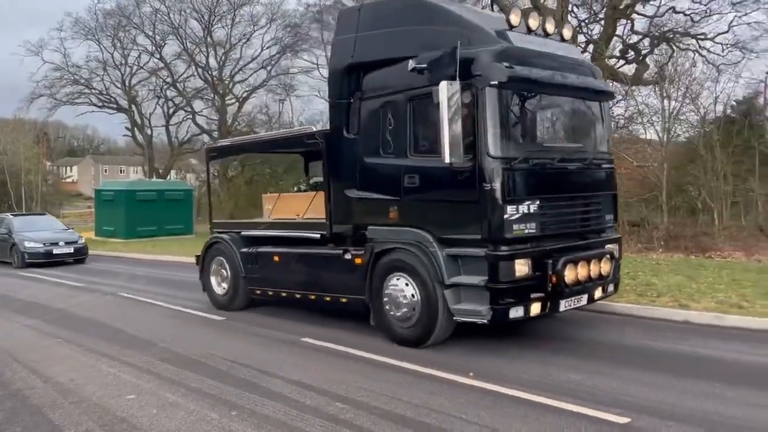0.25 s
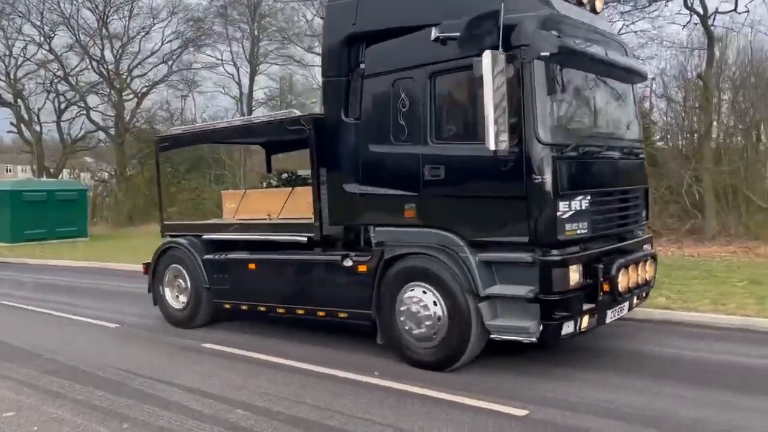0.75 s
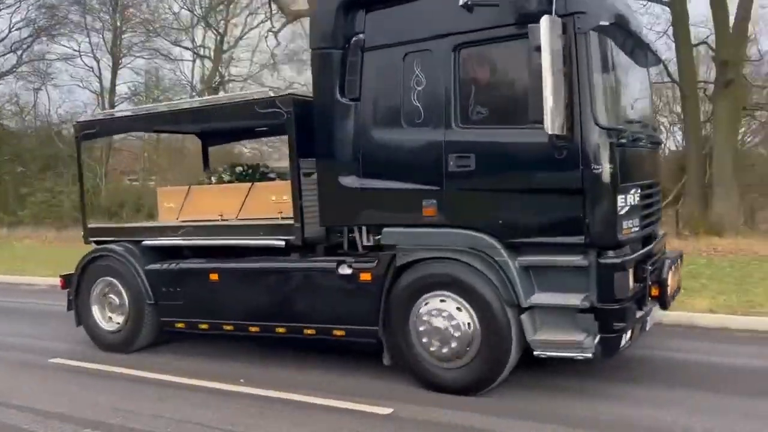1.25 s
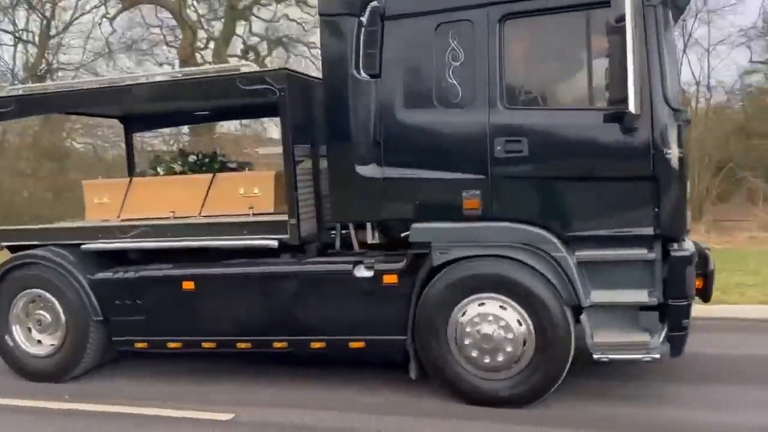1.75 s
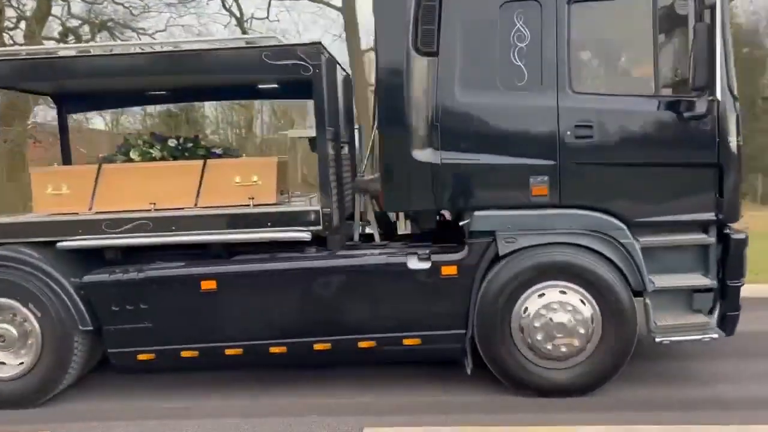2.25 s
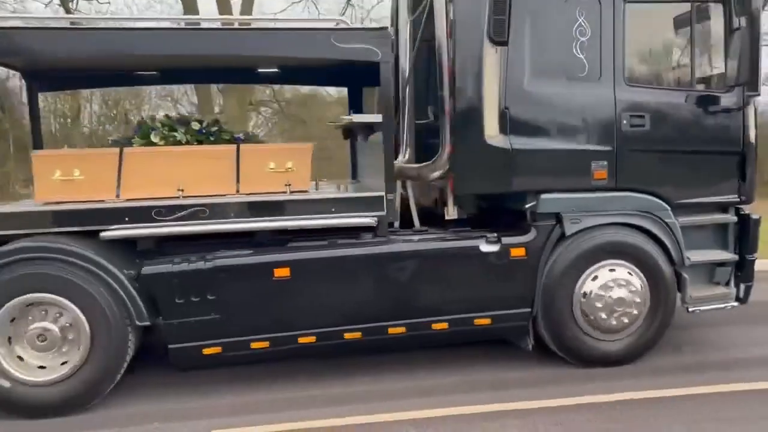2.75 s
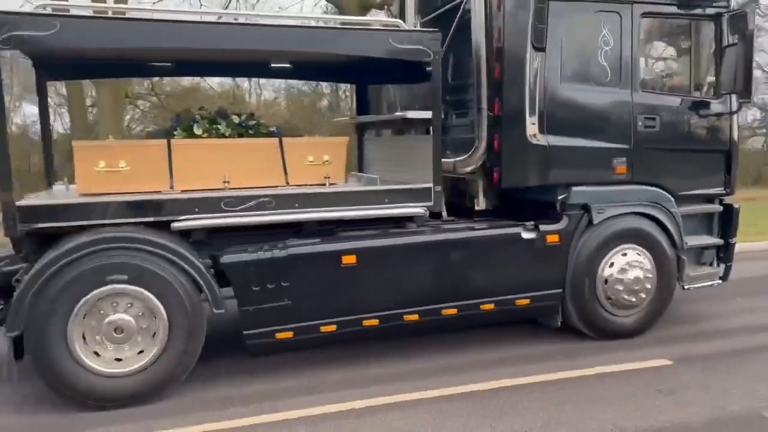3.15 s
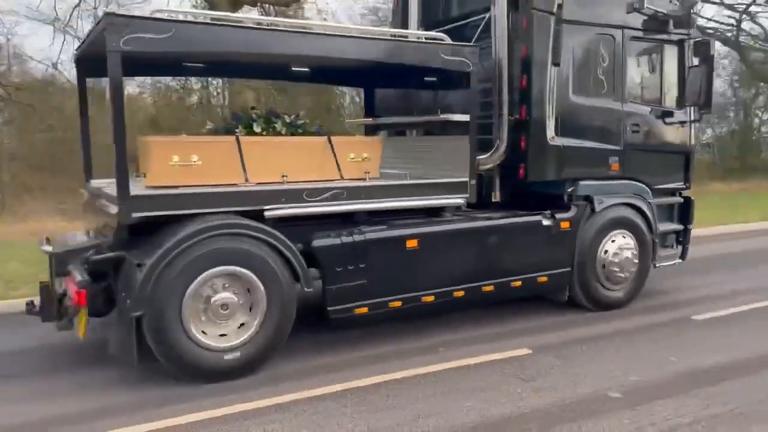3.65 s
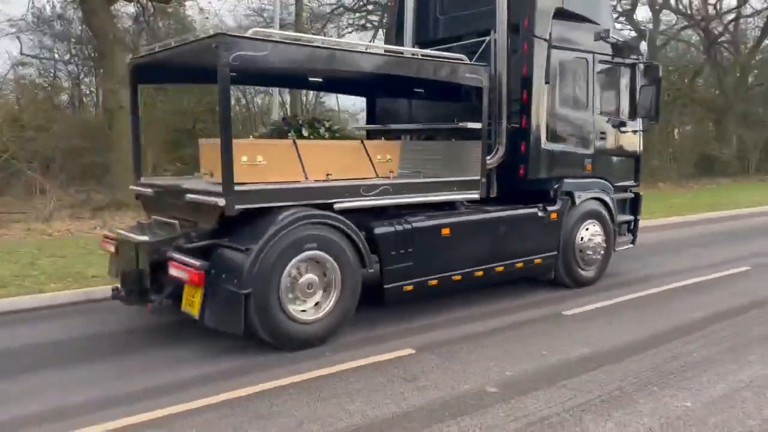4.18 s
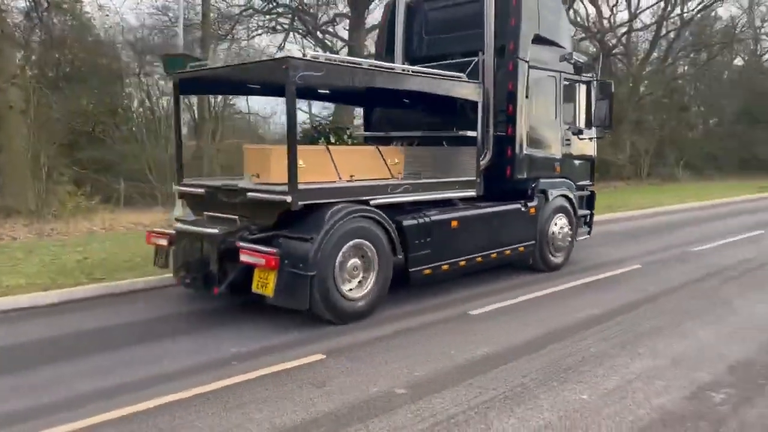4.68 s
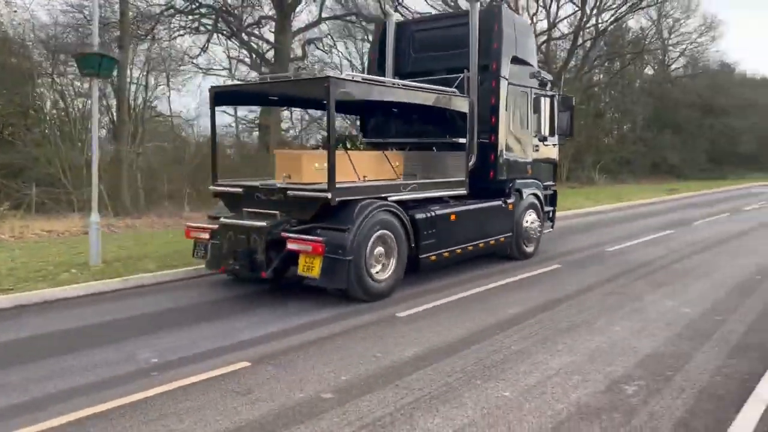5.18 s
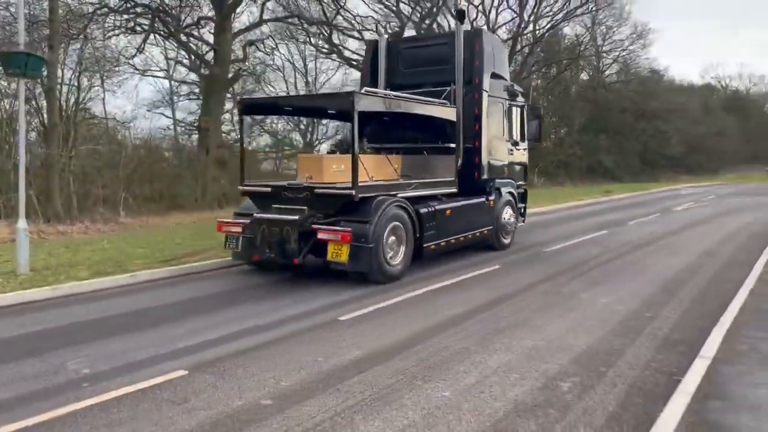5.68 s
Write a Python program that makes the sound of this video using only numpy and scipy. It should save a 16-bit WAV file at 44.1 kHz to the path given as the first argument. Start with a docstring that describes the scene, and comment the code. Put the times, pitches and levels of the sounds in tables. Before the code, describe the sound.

One loud, low-pitched truck horn blast cuts off with a faint echo, then a steady chugging diesel rolls by close at hand.

```python
"""An air horn on a lorry holds one note for a second and a half as the lorry rolls past a few metres away.
The horn is a sum of swelling partials; scattered delays make its faint echo from trees by the road.
The six-cylinder diesel, steady at three beats a revolution, one a heavy thump, is crank-locked tones and gated
noise: it booms from the side and thuds from behind. Ringing noise makes combustion clatter and a rattling panel,
crank-locked tones make whining gears, and shaped noise makes the tyres, a low rumble and wind."""
import sys
import numpy as np
from scipy import signal
from scipy.fft import rfft, irfft
from scipy.io import wavfile

SR = 44100
rng = np.random.default_rng(int(sys.argv[2]) if len(sys.argv) > 2 else 0)


def put_to_file(sound):
    """Save the sound as 16-bit audio at rate SR, in the file named by the first command-line argument."""
    columns = np.atleast_2d(sound).T  # one column per channel
    safe = np.clip(columns, -1, 1)
    whole_steps = np.round(safe * 32767)
    wavfile.write(sys.argv[1], SR, whole_steps.astype(np.int16))


N = 261200
TIME = np.arange(N) / SR
FREQS = np.maximum(np.arange(N // 2 + 1) * SR / N, 1)
SPEED_M_PER_S, NEAREST_M, AIR_M_PER_S = 3.2, 4.8, 343

# crankshaft speed: (time [s], speed [revolutions/s])
CRANK_SPEED = [(0, 17.13), (1.5, 17.125), (2, 17.1), (2.7, 17.125), (3.8, 17.125), (4.4, 17.045),
               (5.92, 17.015)]


def from_db(db):
    """Decibels to gain."""
    return 10 ** (np.asarray(db) / 20)


def rms_one(x):
    """Scale to unit power."""
    return x / np.sqrt(np.mean(x ** 2) + 1e-20)


def in_time(rows):
    """Interpolate each column of a time table, sample by sample."""
    s, *columns = np.transpose(rows)
    return [np.interp(TIME, s, column) for column in columns]


def at_hz(points, hz=FREQS):
    """Read a table on a log-frequency axis."""
    points = np.array(points)
    return np.interp(np.log(hz), np.log(points[:, 0]), points[:, 1])


def hump(hz, centre_hz, octaves):
    """A bell of height 1 on a log-frequency axis."""
    return np.exp(-(np.log2(hz / centre_hz) / octaves) ** 2)


def bell(centre_s, width_s):
    """A smooth rise and fall of height 1 in time."""
    return np.exp(-((TIME - centre_s) / width_s) ** 2)


def colour(x, response):
    """Filter by a frequency response."""
    return irfft(rfft(x) * response, N)


def drift(corner_hz):
    """Slow random signal of unit power."""
    return rms_one(colour(rng.standard_normal(N), 1 / (1 + (FREQS / corner_hz) ** 2)))


def resonances(modes):
    """Response of parallel ringing modes."""
    response = 0
    for hz, width_hz, db in modes:
        response = response + from_db(db) / (1 + 1j * (FREQS ** 2 - hz ** 2) / (FREQS * width_hz))
    return response


def stereo_noise(response, gate=1, source=None):
    """Gated, filtered noise whose likeness in the two channels depends on frequency."""
    # scattered sound: (frequency [Hz], likeness of the two channels [0-1])
    likeness = [(60, .995), (380, .97), (700, .8), (1300, .5), (2400, .35), (3500, .7), (5000, .7),
                (8000, .2)]
    if source is None:
        source = rng.standard_normal((2, N))
    mid, side = source * gate
    alike = np.clip(at_hz(likeness), 0, 1)
    common = colour(mid, response * np.sqrt(1 + alike))
    opposed = colour(side, response * np.sqrt(1 - alike))
    return rms_one(common + opposed * [[1], [-1]])


def path(behind_m=0):
    """Straight steady pass: distance [m] and angle [degrees] from heading to listener, for a point behind the horn."""
    nearest_s = 2.6
    to_go_m = SPEED_M_PER_S * (nearest_s - TIME) + behind_m
    return np.hypot(to_go_m, NEAREST_M), np.degrees(np.arctan2(NEAREST_M, to_go_m))


def road_lag(distance_m, height_m):
    """Delay [s] of the bounce off the road: longest when the source is nearest."""
    listener_m = 1.575
    bounced_m = np.hypot(distance_m, height_m + listener_m)
    direct_m = np.hypot(distance_m, height_m - listener_m)
    return (bounced_m - direct_m) / AIR_M_PER_S


def road_bounce(x, strength):
    """Sound of the high stack plus its reflection: a comb that slides as the lorry moves."""
    behind_m, height_m = 1.05, 3.55
    distance_m, _ = path(behind_m)
    return x + strength * np.interp(TIME - road_lag(distance_m, height_m), TIME, x)


def dipping_gain(source):
    """Gain of a source that sinks for a while during and just after the horn note."""
    # by source: (level [dB], loss [dB], deepest at [s], width [s])
    dips = { "puffs": (-37, 4, 1.12, -0.8), "clatter": (-46, 8, 1.65, 0.48), "gears": (-52, 13, 1.3, 1.24),
            "tyres": (-60, 7.5, 1.74, 0.6), "rumble": (-37, 1.5, 1.1, 1.5), }
    level_db, loss_db, centre_s, width_s = dips[source]
    return from_db(level_db - loss_db * bell(centre_s, width_s))


def ports(x, balance_db, lead_radians):
    """Two microphone ports colour and delay a sound differently, depending on where it comes from."""
    half = from_db(balance_db / 2) * np.exp(.5j * lead_radians)
    return colour(x, np.array([half, 1 / half]))


def firing_gate(turns, cylinder_db, decay_beats, scatter_db, floor):
    """A burst at each firing that decays over the beat; cylinders differ, and so does each stroke."""
    beat = np.floor(3 * turns).astype(int)
    age_beats = 3 * turns - beat
    strength_db = np.array(cylinder_db)[beat % len(cylinder_db)]
    strength_db = strength_db + scatter_db * rng.standard_normal(N)[beat]
    return floor + from_db(strength_db) * np.exp(-age_beats / decay_beats)


def cycle_noise(turns, repeat, count=5, size=5120):
    """Noise that partly returns every two revolutions, its shape changing slowly with the angle."""
    place = (turns / 2 % 1 * size).astype(int)
    weights = np.array([bell(s, 0.9) for s in np.linspace(0, TIME[-1], count)])
    shapes = rng.standard_normal((2, count, size))[..., place]
    returning = (shapes * weights).sum(axis=1) / np.linalg.norm(weights, axis=0)
    fresh = rng.standard_normal((2, N))
    return np.sqrt(repeat) * returning + np.sqrt(1 - repeat) * fresh


def wind():
    """Brief low buffets on the microphone."""
    # gusts: (time [s], width [s], level [dB])
    gusts = [(.33, 0.25, -36), (1.85, 0.17, -41), (3.9, .12, -39), (5.74, .2, -35.5)]
    gain = sum(from_db(db) * bell(s, width_s) for s, width_s, db in gusts)
    return gain * stereo_noise(hump(FREQS, 70, octaves=1.2))


def rumble():
    """Low noise shaped by a fixed spectrum."""
    # spectrum: (frequency [Hz], relative density [dB])
    spectrum = [(8, -23), (20, 3.5), (35, 7), (55, 9), (80, 13.5), (120, 10.5), (200, 12.5), (400, -59)]
    return dipping_gain("rumble") * stereo_noise(from_db(at_hz(spectrum)))


def tyres():
    """Tyre noise: treble with a fixed spectrum, quieter for a while around the end of the horn note."""
    # spectrum: (frequency [Hz], relative density [dB])
    spectrum = [(1000, -8.5), (3000, 1), (4300, 9.5), (5100, -5.5), (5700, -24), (6500, -1), (8700, -0.5),
                (9300, -27), (11000, -21.5)]
    return dipping_gain("tyres") * stereo_noise(from_db(at_hz(spectrum)))


def rattles():
    """Short bursts of chatter ring a loose panel."""
    # bursts: (onset [s], level [dB])
    bursts = [(3.248, -46.5), (3.833, -44), (3.951, -46), (4.474, -40), (4.968, -48), (5.125, -43),
              (5.235, -47), (5.36, -51), (5.674, -45)]
    # panel modes: (frequency [Hz], width [Hz], relative level [dB])
    panel = [(1853, 37, 3), (2010, 29, -7.5), (2420, 90, -14)]
    rise_s = 0.013
    gain = 0
    for s, db in bursts:
        age = np.maximum(TIME - s, 0) / rise_s
        gain = gain + from_db(db) * age * np.exp(1 - age)
    return gain * stereo_noise(resonances(panel) * hump(FREQS, panel[0][0], octaves=0.78))


def gears(turns, knock, swing_radians, wander_radians, waver_db):
    """Timing gears whine; every firing jolts them, which splits each tone into a rough cluster."""
    # tones: (multiple of crank speed, relative level [dB])
    tones = [(203, 0), (215, -2.5), (221, -9)]
    jolt = swing_radians * np.sin(3 * 2 * np.pi * turns)
    whine = 0
    for k, db in tones:
        gain = from_db(db + waver_db * drift(14))
        whine = whine + gain * np.sin(2 * np.pi * k * turns + jolt + wander_radians * drift(8.3))
    return dipping_gain("gears") * rms_one(colour(whine * knock, hump(FREQS, 4230, octaves=1)))


def clatter(turns, knock):
    """Combustion knock: noise gated at each firing, part of it alike in every engine cycle."""
    # spectrum: (frequency [Hz], relative density [dB])
    spectrum = [(500, -17.5), (900, 3.5), (1170, -2), (1350, 0.5), (1680, -6), (2200, -7), (2800, -11),
                (3100, -7), (4000, -14), (5000, -36), (7000, -58.5), (11000, -78.5)]
    source = cycle_noise(turns, repeat=.2)
    return dipping_gain("clatter") * stereo_noise(from_db(at_hz(spectrum)), knock, source)


def block(knock, waver_db, dull_hz):
    """Combustion knocks ring the engine block, heard fully once the gap behind the cab opens."""
    # block modes: (frequency [Hz], width [Hz], relative level [dB])
    modes = [(1915, 25, 5), (2006, 120, -1.5), (2430, 51, -2.5), (3403, 200, -3.5)]
    open_db, hidden_loss_db, gap_opens_s, opening_s = -48.5, 7, 2.8, 0.2
    hidden = 1 / (1 + np.exp((TIME - gap_opens_s) / opening_s))
    response = resonances(modes) / (1 + (FREQS / dull_hz) ** 4)
    gain = from_db(open_db - hidden_loss_db * hidden + waver_db * drift(12))
    return gain * stereo_noise(response, knock)


def thump(turns, scatter_db):
    """One beat a revolution rings a low, well-damped body, heard through the gap behind the cab."""
    lead_turns = .088
    beats = np.diff(np.floor(turns + lead_turns), prepend=-1) > 0
    body = resonances([(170, 170, 0)]) ** 3  # three equal stages
    ring = colour(beats * from_db(scatter_db * drift(17)), body)
    return from_db(-38) * bell(3.45, width_s=0.6) * rms_one(ring)


def puffs(turns, gate, rasp_db, bounce):
    """Gas bursts from the stack: a rasp locked to the crank plus turbulence, both bounced off the road."""
    # turbulence: (frequency [Hz], relative density [dB])
    turbulence = [(30, -46), (90, -19.5), (160, -13), (280, 5.5), (360, -7.5), (420, -0.5), (480, 0),
                  (620, -1.5), (720, -3), (830, -6.5), (1100, -14.5), (1600, -53), (5000, -52)]
    # rasp tones, each heard from its own angle:
    # (nominal frequency [Hz], relative level [dB], strongest at [s], width [s])
    rasp_tones = [(428, -54.5, 3.4, 0.34), (462, -50.5, 4.1, 0.33), (479.1, -50, 3.7, 0.75),
                  (545, -54, 4.8, 1.1), (562, -56, 4, 0.73), (597, -52.5, 4.6, 1.3), (613.7, -52, 5.1, 1.1),
                  (666, -55.5, 5.6, 0.36), (683.7, -54, 4.2, 1.8), (717, -55, 3.0, 2.2),
                  (376.8, -56, 5.7, .5), (325, -47, 2.9, .8)]
    wander_cycles = .16
    crank_hz = np.mean(np.array(CRANK_SPEED)[:, 1])
    rasp = 0
    for hz, db, s, width_s in rasp_tones:
        multiple = np.round(hz / crank_hz)
        cycles = multiple * turns + rng.random() + wander_cycles * drift(3.7)
        rasp = rasp + from_db(db) * bell(s, width_s) * np.sin(2 * np.pi * cycles)
    rasp = rms_one(colour(rasp * gate, 1 / (1 + (FREQS / 4230) ** 4)))
    gas = stereo_noise(from_db(at_hz(turbulence)), gate, cycle_noise(turns, repeat=.6))
    gas = gas + from_db(rasp_db) * rasp
    return dipping_gain("puffs") * rms_one(np.array([road_bounce(channel, bounce) for channel in gas]))


def causal_phase(gains, size=256):
    """Phase lags of a passive pipe with these harmonic gains: a sharp front, then ringing."""
    harmonics = np.arange(1, len(gains) + 1)
    cepstrum = irfft(np.log(np.interp(np.arange(size // 2 + 1), harmonics, gains)))
    return rfft(2 * cepstrum[:size // 2], size).imag[1:len(gains) + 1]


def exhaust(turns, rough_db, jitter_turns):
    """Firing pulses shaped by the pipe; unequal cylinders fill in between the firing orders."""
    # note from ahead, the side and behind: (multiple of crank speed, level [dB])
    front = [(1, -68), (2, -48.5), (3, -44), (4, -56.5), (5, -58), (6, -33.5), (7, -54), (8, -45.5),
             (9, -39), (10, -50.5), (11, -36.5), (12, -32), (13, -48.5), (14, -63.5), (15, -66),
             (16, -50.5), (17, -62), (18, -63.5), (19, -48), (20, -55), (21, -61), (22, -49.5)]
    side = [(1, -72.5), (2, -49.5), (3, -37.5), (4, -57), (5, -63), (6, -31.5), (7, -61.5), (8, -51.5),
            (9, -27.5), (10, -41.5), (11, -29.5), (12, -29.5), (13, -42.5), (14, -48.5), (15, -37.5),
            (16, -44.5), (17, -65.5), (18, -48.5), (19, -52), (20, -50), (21, -46.5), (22, -45)]
    rear = [(1, -76.5), (2, -53.5), (3, -31.5), (4, -51.5), (5, -55.5), (6, -33), (7, -51.5), (8, -57),
            (9, -58), (10, -53), (11, -54.5), (12, -34.5), (13, -43.5), (14, -43), (15, -35), (16, -35.5),
            (17, -52), (18, -41.5), (19, -47.5), (20, -59.5), (21, -50), (22, -57.5)]
    faces_s = [1.5, 3.3, 5.15]  # when the lorry shows each face
    levels_db = np.array([front, side, rear])[..., 1]
    lags = np.array([causal_phase(from_db(face)) for face in levels_db])
    uneven = turns + jitter_turns * drift(30)
    note = 0
    for k, (face_db, face_lag) in enumerate(zip(levels_db.T, lags.T), 1):
        db, lag = in_time(np.transpose([faces_s, face_db, face_lag]))
        note = note + from_db(db) * np.cos(2 * np.pi * k * uneven + lag)
    return from_db(rough_db * drift(22)) * note


def roadside(x, t60_s, dull_hz, thin_hz, count=24):
    """Scattered tree echoes, different on each side; delays slide as the lorry nears or leaves each tree."""
    out = np.zeros((2, N))
    for k, (delay_s, heading) in enumerate(rng.uniform([.02, -1], [.27, 1], (count, 2))):
        lag_s = delay_s + heading * SPEED_M_PER_S * TIME / AIR_M_PER_S
        out[k % 2] += from_db(-60 * delay_s / t60_s) * np.interp(TIME - lag_s, TIME, x, left=0)
    return colour(out, 1 / (1 + 1j * FREQS / dull_hz) / (1 + thin_hz / (1j * FREQS)))


def horn(bounce, flutter, release_slope):
    """A reed drives a flared pipe high on the cab; partials swell and fade as the lorry moves."""
    # partials: (multiple, level [dB])
    partials = [(1, -1.5), (2, -4), (3, -15), (4, -21.5), (5, -31.5), (6, -30), (7, -42.5), (8, -27.5),
                (9, -31), (10, -33.5), (11, -27), (12, -30.5), (13, -36), (14, -41), (16, -55.5), (20, -63),
                (34, -81.5)]
    # momentary swells, under their multiple: (time [s], width [s], change [dB])
    partial_swells = { 1: [(.05, 0.1, 0.5), (.33, 0.12, -1.7), (.5, 0.068, 1)], 2: [(1.29, 0.11, -10.5)],
                      3: [(0, .11, -9.5), (1.35, .25, 4.5)], 4: [(.1, .16, -10.5), (.76, 0.08, -4),
                      (1.25, 0.15, 4)], 5: [(.52, 0.17, 6.5)], 6: [(.02, .1, 7), (.38, 0.22, -16),
                      (.68, 0.071, 10), (1.1, .1, 6), (1.32, 0.07, -9)], 7: [(.58, .06, 10), (1.0, .2, 14)],
                      8: [(.17, 0.086, -8.5), (.5, 0.1, 8.5), (.94, 0.089, 10)], 9: [(.33, 0.13, 4.5),
                      (.62, 0.085, -7.5), (1.25, 0.24, 4.5)], 10: [(.04, 0.062, 6.5), (.66, 0.09, -10.5)],
                      11: [(0, .08, 4.5), (.7, 0.071, 6)], 14: [(.15, 0.083, 6.5), (.43, .05, 11.5)], }
    rest_hz, sag_hz_per_s, height_m = 252.2, 20, 3.655
    valve_shut_s, release_db_per_s = 1.52, 155
    level_db, turn_db_per_deg, buzz_db_per_deg = -9, 0.28, 2.5  # buzz loss at its band centre
    swell_db, swell_middle_db = 4, 11

    distance_m, angle_deg = path()
    turned_deg = angle_deg - angle_deg[0]
    lag_s = road_lag(distance_m, height_m)
    swell = bell(0.35, width_s=0.38)
    # once the valve shuts the pressure runs out: the pitch sags, and the upper partials die first
    shut_s = np.maximum(TIME - valve_shut_s, 0)
    release_db = release_db_per_s * shut_s
    doppler = 1 - np.gradient(distance_m, TIME) / AIR_M_PER_S
    pitch_hz = (rest_hz - sag_hz_per_s * shut_s) * doppler
    phase = 2 * np.pi * np.cumsum(pitch_hz * (1 + flutter * drift(71))) / SR
    bounced_phase = phase - 2 * np.pi * pitch_hz * lag_s
    note = np.zeros(N)
    for k in range(1, 35):
        start = rng.uniform(0, 2 * np.pi)
        partial = np.sin(k * phase + start) + bounce * np.sin(k * bounced_phase + start)
        # the horn points ahead: its reed buzz fades faster as it turns away
        buzz_db = -buzz_db_per_deg * hump(k * rest_hz, 3240, octaves=0.24) * turned_deg
        middle_db = swell_middle_db * hump(k * rest_hz, 920, octaves=0.79) * swell
        own_db = sum(db * bell(s, width_s) for s, width_s, db in partial_swells.get(k, []))
        fade_db = release_slope * release_db * np.log2(k)
        note += from_db(at_hz(partials, k) - fade_db + buzz_db + middle_db + own_db) * partial
    gain_db = level_db - turn_db_per_deg * turned_deg + swell_db * swell - release_db
    return note * NEAREST_M / distance_m * from_db(gain_db) * (1 + .03 * drift(50))


def scene():
    """Horn, engine and tyres, all passing together."""
    # microphone pair: (frequency [Hz], left-right balance [dB])
    port_balance = [(60, 0), (130, -.3), (200, -2), (290, -2.5), (430, 0), (640, -6), (950, 3.5),
                    (1400, 2.5), (2080, -1.5), (3090, -2.5), (4580, -.5)]
    # microphone pair: (frequency [Hz], left lead [radians])
    port_phase = [(60, 0), (600, .1), (860, 1.6), (1380, -.1), (1890, -.7), (2150, .5), (2410, -.8),
                  (2670, .2), (3450, .5), (3700, .2), (4700, 0)]
    # horn at the pair: (frequency [Hz], left-right balance [dB], left lead [radians])
    horn_ports = np.array([(254, -2.8, -.3), (508, -2, .05), (762, -4.3, 1.45), (1016, 6.3, .7),
                           (1270, 5, -.8), (1524, 1, -.7), (1778, -6, -2.6), (2032, 0, -3.6),
                           (2286, -2, -1.9), (2540, 4, -1.5), (2794, -3, -2.2), (3048, -4, -1.1),
                           (3300, -2.5, -.3), (4600, 0, 0)])
    first_beat_s = .037
    speed, = in_time(CRANK_SPEED)
    turns = np.cumsum(speed) / SR - first_beat_s * speed[0]

    gas = firing_gate(turns + .12, [-1, -1.3, 4, 0, -1.3, 3.6], decay_beats=.45, scatter_db=1.1, floor=.47)
    knock = firing_gate(turns + .08, [1.5, -1, 0, 2.5, -1, 0], decay_beats=.5, scatter_db=1.5, floor=.72)
    slap = firing_gate(turns, [2, 2, -3, -1, 4, -3], decay_beats=.5, scatter_db=2, floor=.7)

    rest = wind() + rumble() + tyres() + rattles()
    rest = rest + gears(turns, knock, swing_radians=1.1, wander_radians=.9, waver_db=2.5)
    rest = rest + clatter(turns, knock) + block(slap, waver_db=1.9, dull_hz=9200)
    rest = rest + thump(turns, scatter_db=6.0)
    rest = rest + puffs(turns, gas, rasp_db=-7, bounce=.38)
    rest = rest + exhaust(turns, rough_db=.55, jitter_turns=.001)
    blast = horn(bounce=0.15, flutter=0.0003, release_slope=0.69)
    rest = rest + from_db(-12.5) * roadside(blast, t60_s=0.67, dull_hz=3500, thin_hz=615)

    heard_horn = ports(blast, at_hz(horn_ports[:, :2]), at_hz(horn_ports[:, ::2]))
    return heard_horn + ports(rest, at_hz(port_balance), at_hz(port_phase))


def record(dry):
    """Cut the top with a steep low-pass at 11 kHz."""
    return signal.sosfilt(signal.butter(12, 11000, fs=SR, output="sos"), dry)


dry = scene()
out = record(dry)
put_to_file(out)
```